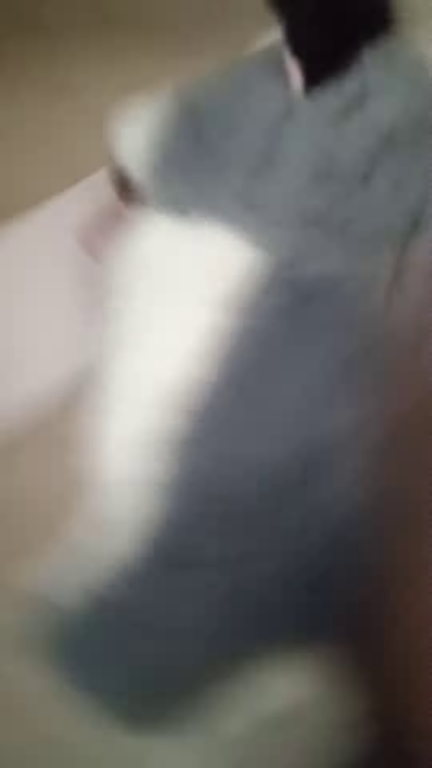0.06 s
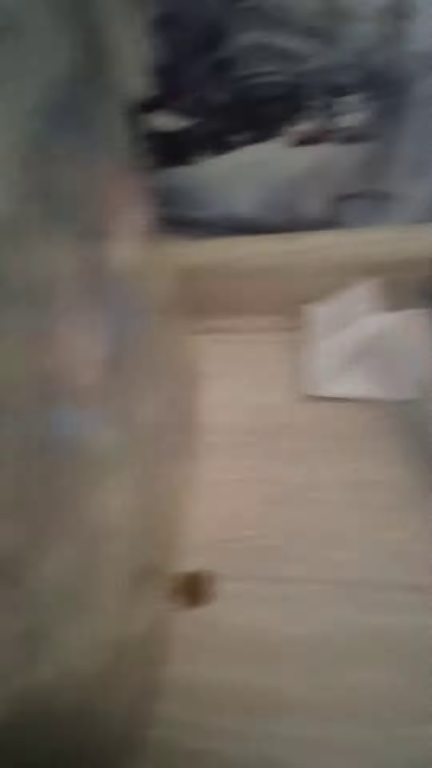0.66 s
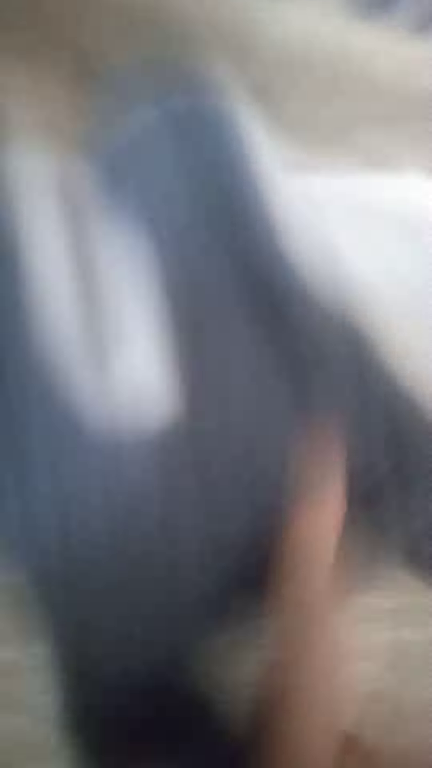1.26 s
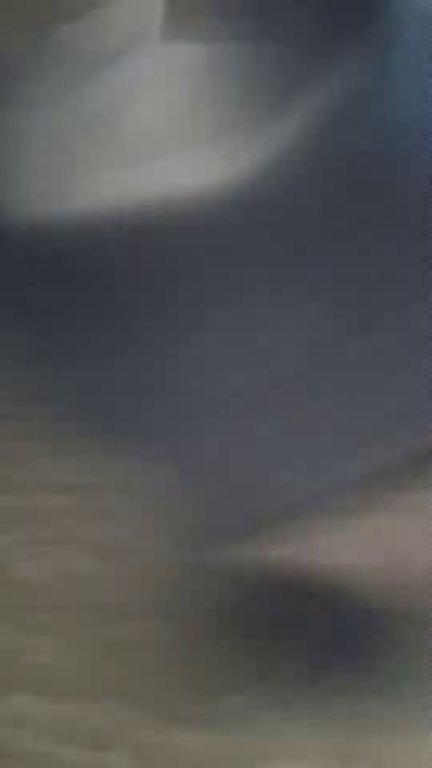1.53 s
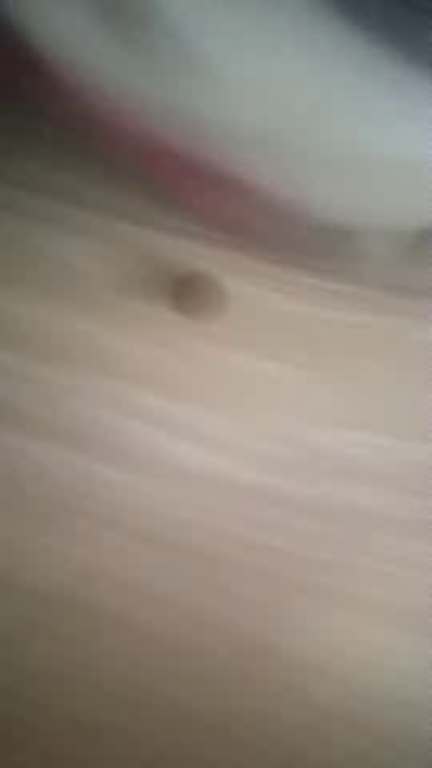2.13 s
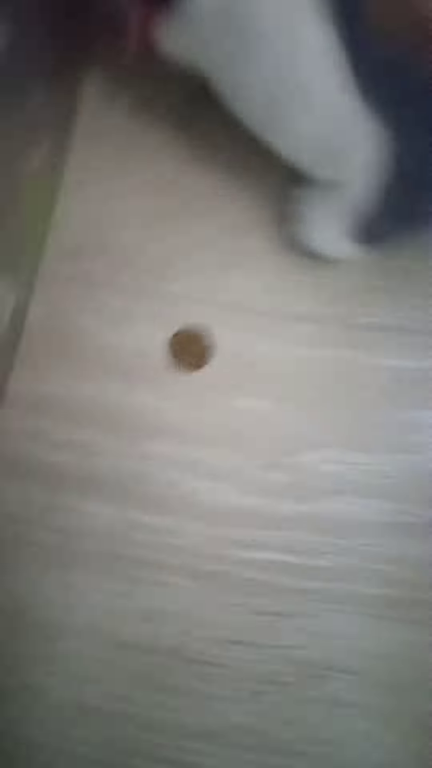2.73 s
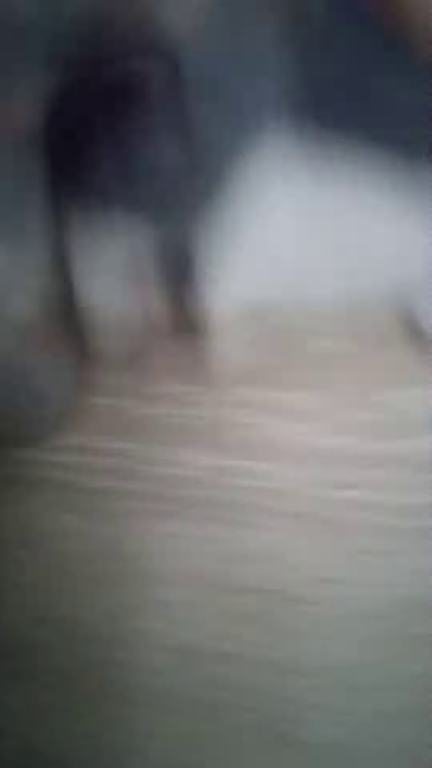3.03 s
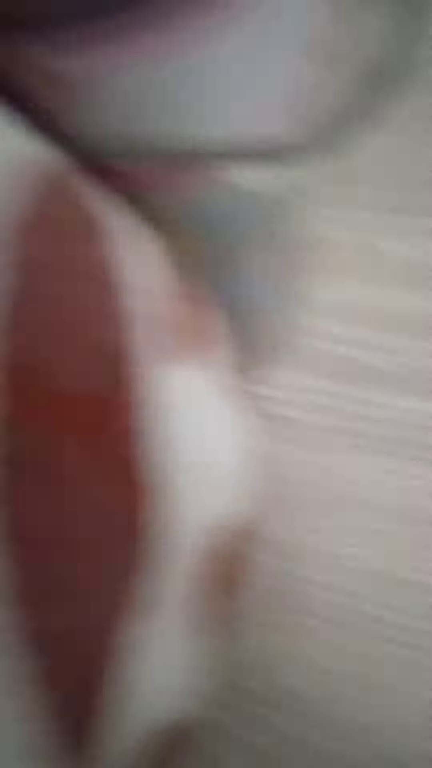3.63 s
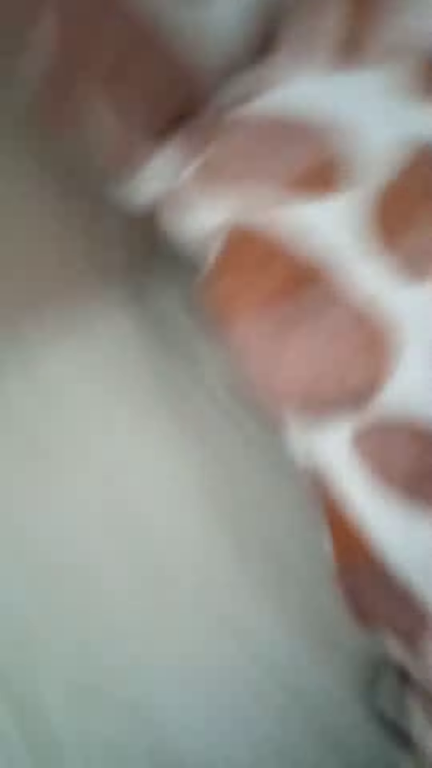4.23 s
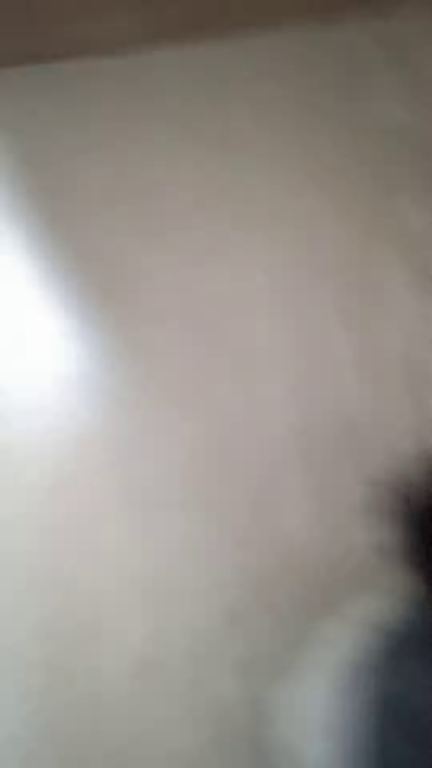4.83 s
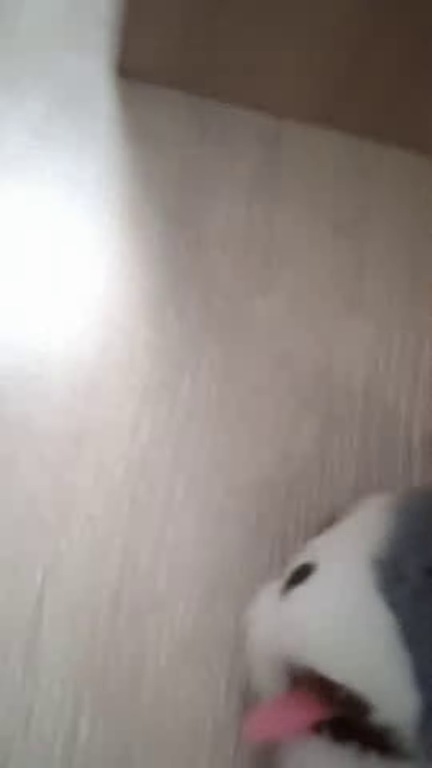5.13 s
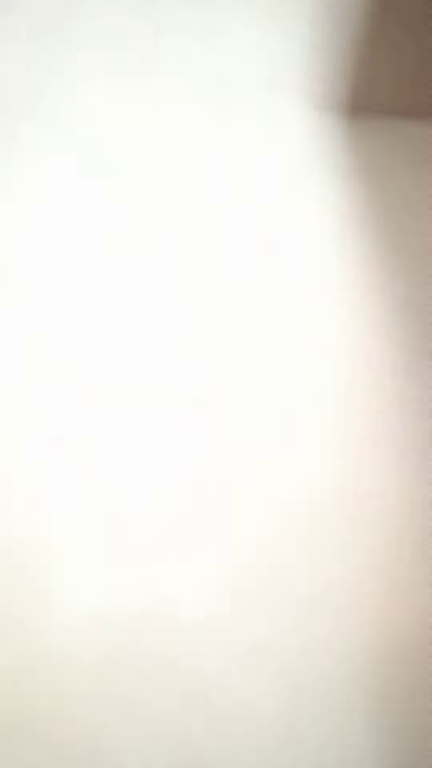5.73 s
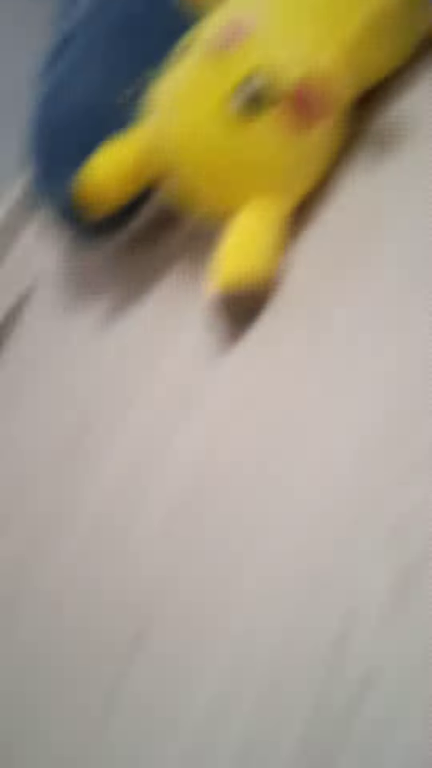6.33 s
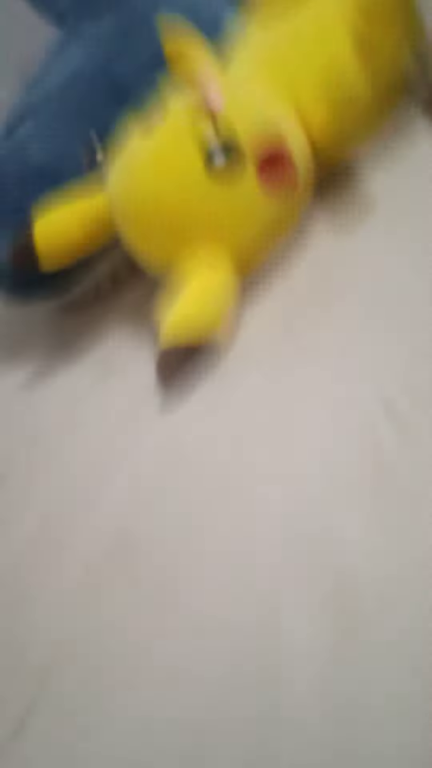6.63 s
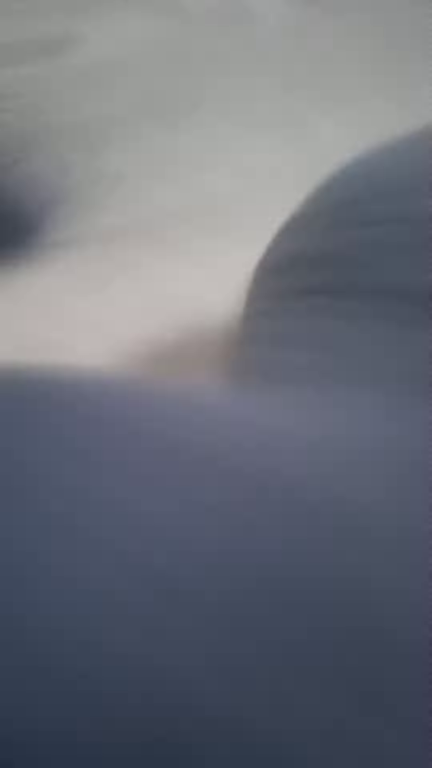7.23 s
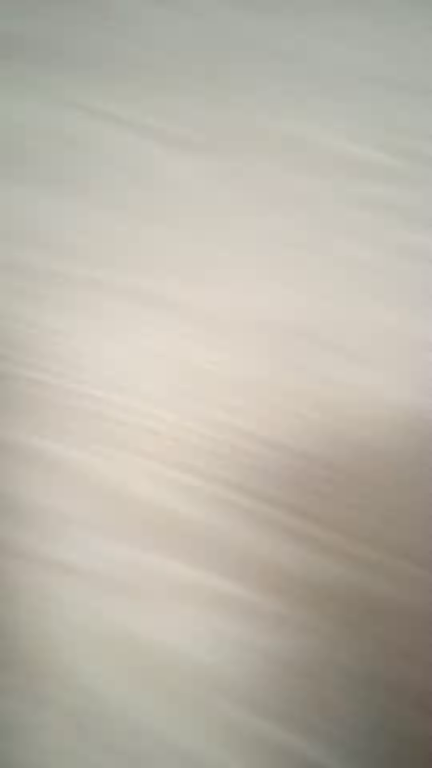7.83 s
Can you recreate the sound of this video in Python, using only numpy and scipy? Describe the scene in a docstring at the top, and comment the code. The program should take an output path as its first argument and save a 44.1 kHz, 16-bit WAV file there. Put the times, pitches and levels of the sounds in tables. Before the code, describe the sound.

A plush toy is squeezed and pushed about on a wooden floor, close to the microphone. Faint, very short reedy squeaks start at once, among swishing fabric and dull bumps, with a firm thump at about 0.8 seconds. From 1.4 to 3.1 seconds the squeaks come quickly and unevenly, some higher and raspier, the loudest near 1.7 seconds. Hands and toys thump and clack most busily between 1.6 and 2.1 seconds, and the stuffing crunches softly with each squeeze. Weaker squeaks and lighter knocks continue until about 5.1 seconds. A quieter stretch follows, with only faint rubbing and a few soft thuds. One last sharp squeak sounds at about 7.1 seconds, then a solid knock at 7.3 and light rustling and taps until the end near 8 seconds. The small room adds a short echo and a faint hush.

```python
"""Squeaky plush toy on a wooden floor

A plush toy is pushed about and squeezed in quick, short bursts. Each squeeze blows air through a
reed for a few hundredths of a second, and the pitch rises and sags with the air pressure.
Fabric rustles, stuffing crunches, and hands and toys bump the floor and the hand-held phone.
A small room adds its echo and a faint background hush."""
import sys
import numpy as np
from scipy import signal
from scipy.fft import rfft, irfft
from scipy.io import wavfile
from scipy.ndimage import uniform_filter1d, map_coordinates

SR = 44100
rng = np.random.default_rng(int(sys.argv[2]) if len(sys.argv) > 2 else 0)


def waveform_to_disk(signal):
    """Save audio, clipped to [-1, 1], as 16-bit WAV at the path in sys.argv[1]."""
    frames = np.transpose(np.atleast_2d(signal))
    scaled = np.clip(frames, -1, 1) * 32767
    samples = np.round(scaled).astype(np.int16)
    wavfile.write(sys.argv[1], SR, samples)


N = 347052
TIME = np.arange(N) / SR
TOP_HZ = 16000


def amp(db):
    """Turn decibels into a number to multiply by."""
    return 10 ** (np.asarray(db) / 20)


def unit(x):
    """Scale a sound to an average (rms) level of 1."""
    return x / np.sqrt(np.mean(x ** 2))


def gain_at(hz, points):
    """Read the gain at a pitch from a tone colour: a list of (pitch_hz, level_db) points."""
    pitch_hz, level_db = np.transpose(points)
    return amp(np.interp(np.log(np.maximum(hz, 1)), np.log(pitch_hz), level_db))


def colour(x, points):
    """Turn the lows and highs of a sound up or down to follow a tone colour."""
    return irfft(rfft(x) * gain_at(np.fft.rfftfreq(len(x), 1 / SR), points), len(x))


def band(x, low_hz, high_hz, order=2):
    """Keep the part of a sound between two pitches."""
    return signal.sosfilt(signal.butter(order, [low_hz, high_hz], "band", fs=SR, output="sos"), x)


def wander(turns_per_s):
    """A random curve that drifts around zero, by about 1 either way."""
    knots = rng.standard_normal(N // 4)
    return np.interp(TIME * turns_per_s, np.arange(len(knots)), knots)


def add(track, start_s, sound):
    """Mix a sound into a track at the given time."""
    i = int(start_s * SR)
    track[i:i + len(sound)] += sound[:N - i]


def fade(t, fade_s):
    """A curve that dies away, dropping 60 dB in fade_s seconds."""
    return np.exp(-np.log(1000) * t / fade_s)


def ring(t, hz, fade_s):
    """One dying tone of something struck."""
    return np.sin(2 * np.pi * hz * t) * fade(t, fade_s)


def burst(x, seconds):
    """Give a short sound the energy of level 1 held for the given time."""
    return x * np.sqrt(seconds * SR / np.sum(x ** 2))


# Tone colour of the quiet room: pitch_hz, level_db
HUSH_COLOUR = [(40, -10.5), (110, -0.5), (300, -10.5), (2200, -16.5), (4000, -24.5), (7000, -22.5),
               (11000, -38.5)]


def background(level_db=-69.0):
    """Faint air in the room and hiss from the microphone."""
    return amp(level_db + wander(1.1)) * unit(colour(rng.standard_normal(N), HUSH_COLOUR))


# Tone colour of hissing fibres: pitch_hz, level_db
FABRIC_COLOUR = [(1500, -6.5), (3000, -5.5), (7000, 7), (9000, -11.5), (13500, -17), (15300, -2)]
# Strokes of plush over wood and skin: start_s, end_s, swish_hz, level_db
STROKES = [(0, 0.345, 1500, -62), (0.37, 0.906, 2180, -59.5), (0.973, 1.147, 1680, -57),
           (1.291, 1.86, 1650, -61), (1.954, 2.226, 2130, -59), (2.33, 2.72, 2400, -67),
           (3.098, 3.554, 2980, -67), (3.547, 3.777, 2730, -57), (4.159, 4.606, 901, -67),
           (5.118, 5.507, 1500, -67.5), (5.8, 5.953, 1710, -73.5), (6.191, 6.777, 2310, -84),
           (6.826, 7.363, 2204, -70.5), (7.516, 7.738, 2000, -66.5), (7.721, 7.893, 1470, -64)]


def rubbing(catches_per_s=65, catch_fade_s=0.013, swish_width=1.15, seam_db=-22.5, hold_s=0.59):
    """Sliding plush swishes and hisses, rumbles in the phone and crackles at the seams."""
    out = np.zeros(N)
    hiss = unit(colour(rng.standard_normal(N), FABRIC_COLOUR))
    rumble = unit(band(rng.standard_normal(N), 75, 350))
    scrape = unit(band(rng.standard_normal(N), 300, 1700))
    catches = rng.random(N) < catches_per_s / SR
    catches = catches * amp(3.5 * np.minimum(rng.exponential(size=N), 2))
    slip = fade(TIME[:SR // 20], catch_fade_s)
    catches = signal.fftconvolve(catches, slip * (1 - slip))[:N]  # each catch gives way softly
    crackle = unit(band(catches * rng.standard_normal(N), 450, 3000))
    travel = np.cumsum(1 + 0.11 * wander(10))  # a faster hand makes a higher swish
    for start_s, end_s, swish_hz, level_db in STROKES:
        i = np.flatnonzero((TIME > start_s) & (TIME < end_s))
        swell = np.sin(np.pi * (TIME[i] - start_s) / (end_s - start_s)) ** 0.24
        noise = rng.standard_normal(2 * len(i))
        narrow = unit(band(noise, swish_hz / swish_width, swish_hz * swish_width))
        swish = map_coordinates(narrow, [travel[i] - travel[i[0]]], order=3)
        swish += amp(-4) * rumble[i] + amp(-8) * scrape[i]
        out[i] += amp(level_db) * swell * (amp(-1) * swish + amp(-1.5) * hiss[i] + amp(2) * crackle[i])
    out += amp(seam_db) * grip(hold_s) * crackle  # gripping the toy also crackles the seams
    return out * amp(4.5 * wander(22))  # the hand presses unevenly


def light_taps(per_stroke=4, scatter_db=4, fade_s=0.018):
    """Fingertips and seams tap at random moments during every stroke."""
    force = np.zeros(N)
    tap = burst(fade(TIME[:SR // 20], fade_s), 0.0044)
    for start_s, end_s, _, stroke_db in STROKES:
        for when, strength in rng.random((per_stroke, 2)):
            tap_s = start_s + when * (min(end_s, TIME[-1]) - start_s)
            add(force, tap_s, amp(stroke_db - 2 * scatter_db * (1 - strength)) * tap)
    return force * unit(band(rng.standard_normal(N), 900, 2800))


# Squeezes of the toy; low_tones_db turns the squeak's lowest tones up or down.
# peak_s, length_s, top_pitch_hz, level_db, low_tones_db, rebound_count
SQUEEZES = [(0.102, 0.012, 966, -40, -3.5, 0), (0.195, 0.015, 933, -37, 2.5, 0),
            (0.635, 0.014, 983, -33, 1, 0), (1.029, 0.042, 993, -32.5, -10, 0),
            (1.327, .013, 832.9, -42, -4, 0), (1.426, 0.017, 986.6, -30, -8, 0),
            (1.545, .032, 1477, -23, -2.5, 1), (1.672, 0.018, 1088, -17, -11, 0),
            (1.868, .022, 1112, -30.5, -4.5, 1), (1.916, .026, 1023, -25.5, -1, 1),
            (2.097, .022, 991, -34.5, 0.5, 0), (2.276, 0.017, 1179, -24.5, 0, 0),
            (2.46, 0.019, 1060, -28, -2, 0), (2.662, .014, 1015, -31.5, -3, 0),
            (2.698, .015, 929, -40, -9, 0), (2.817, 0.032, 1232, -27.5, -5, 1),
            (3.003, 0.012, 885, -42.5, -3, 0), (3.09, 0.029, 1280, -24, -6.5, 0),
            (3.469, .015, 970, -30.5, -4, 0), (3.553, 0.014, 873, -34.5, -12, 0),
            (3.679, .017, 961, -30, -23, 0), (3.962, 0.018, 1001, -29.5, -4, 0),
            (4.273, 0.013, 942, -35, -5, 0), (4.381, 0.012, 869, -37.5, 7, 0),
            (4.439, 0.036, 895, -40, -3, 0), (4.887, .034, 839, -40.5, 0, 0),
            (5.113, .027, 984, -32, -2.5, 0), (7.065, 0.018, 1002, -24.5, -16, 1)]
REED_HZ = 970  # the reed's own pitch; a harder blow forces it higher


def puffs(gap_in_lengths=0.92, rebound_db=-3.5, pitch_share=0.45):
    """List the puffs of air: one per squeeze, and a weaker one when the bellows spring back."""
    return [(peak_s + k * gap_in_lengths * length_s, length_s,
             REED_HZ + (hz - REED_HZ) * pitch_share ** k, level_db + k * rebound_db, low_db)
            for peak_s, length_s, hz, level_db, low_db, rebounds in SQUEEZES
            for k in range(round(rebounds) + 1)]


def air_pressure(rise=0.075, sag=0.13, leak=0.015, reach=1.1):
    """Each puff swells and falls. Returns the reed's pitch, the blow's strength and the low tones' dB."""
    weight, pitch, power, low = np.zeros((4, N))
    for peak_s, length_s, hz, level_db, low_db in puffs():
        i = np.flatnonzero(abs(TIME - peak_s) < reach * length_s / 2)
        place = (TIME[i] - peak_s) / (length_s / 2)  # negative before the peak, positive after
        arch = np.cos(np.pi / 2 * place / reach) ** 1.64
        # The pitch starts a little low and sags as the air runs out.
        droop = np.where(place < 0, rise * abs(place) ** 3, sag * place ** 2) + leak * place
        droop += max(1 - REED_HZ / hz, 0) * (1 - arch ** 0.7)  # a forced pitch holds only at the peak
        weight[i] += arch
        pitch[i] += arch * hz * (1 - droop)
        power[i] += arch * amp(level_db) ** 2
        low[i] += arch * low_db
    weight[weight == 0] = 1
    blended_hz = np.interp(TIME, TIME[pitch > 0], (pitch / weight)[pitch > 0])  # puffs share one reed
    smooth_hz = uniform_filter1d(blended_hz, size=130)  # the reed cannot change pitch at once
    return smooth_hz, np.sqrt(power), low / weight


def grip(hold_s):
    """How hard the hand holds the toy: the blow, spread over the time of closing and letting go."""
    _, blow, _ = air_pressure()
    size = int(hold_s * SR)
    return uniform_filter1d(uniform_filter1d(blow, size=size), size=size)


def stuffing(crunch_db=-22, hold_s=0.055):
    """The stuffing crunches as the hand closes on the squeaker and lets go."""
    fibres = unit(band(rng.standard_normal(N), 450, 4500))
    return amp(crunch_db + 4.9 * wander(200)) * grip(hold_s) * fibres


def fingers_landing(relative_db=-19, lead_s=0.006, fade_s=0.032):
    """Fingers land just before each squeak, harder for a louder squeeze."""
    out, t = np.zeros(N), TIME[:SR // 20]
    for peak_s, length_s, _, squeeze_db, _, _ in SQUEEZES:
        tap = band(rng.standard_normal(len(t)) * fade(t, fade_s), 700, 5000)
        add(out, peak_s - length_s / 2 - lead_s, amp(relative_db + squeeze_db) * burst(tap, 0.005))
    return out


# Tone colour of the reed in its tube: pitch_hz, level_db
SQUEAKER_COLOUR = [(1000, -3), (2000, -5), (3000, -9), (4300, -7), (4700, 0), (6000, -1.5), (7000, -8.5),
                   (8200, -17), (9500, -15.5), (11200, -28.5), (12600, -26), (14000, -24), (15200, -29)]


def squeaker(pitch_wobble=0.06, drift_db=5.0, flutter_db=3.5, clean_hz=1010, wild_hz=1600):
    """A reed buzzes in a short plastic tube; blown too hard, it rattles and hisses."""
    hz, blow, low_db = air_pressure()
    overblown = np.maximum(hz - clean_hz, 0) / (wild_hz - clean_hz)
    rough = np.clip(0.2 + overblown + (4 * blow) ** 2, 0, 1)  # even a gentle puff rasps a little
    phase = 2 * np.pi * np.cumsum(hz * (1 + pitch_wobble * rough * wander(900))) / SR
    tone, power = np.zeros((2, N))
    for k in range(1, 19):  # tones at whole multiples of the pitch
        strength = gain_at(k * hz, SQUEAKER_COLOUR) * (k * hz < SR / 2)
        strength *= amp(drift_db * wander(60))  # stuffing and fingers muffle each tone differently
        lowness = np.clip(2 - k * hz / 2200, 0, 1)
        strength *= amp(low_db * lowness)
        tone += strength * np.sin(k * phase + rng.uniform(0, np.pi))
        power += strength ** 2 * (1 - lowness / 2) / 2
    pulsing_air = rng.standard_normal(N) * (1 + np.cos(phase))
    hiss = unit(band(colour(pulsing_air, SQUEAKER_COLOUR), 2200, TOP_HZ, order=1))
    reed = tone / np.sqrt(power) * amp(flutter_db * rough * wander(700))
    return blow * (reed + rough * hiss)


# Low tones of the wooden floor: pitch_hz, fade_s, level_db
FLOOR_TONES = [(86.5, 0.27, -17.5), (114.1, 0.16, -13), (171.9, 0.13, -12.5), (328, 0.1, -14.5)]
# Tone colour of the tick of contact: pitch_hz, level_db
TICK_COLOUR = [(1800, -9.5), (3000, -11.5), (6800, -1), (8500, -13.5), (13000, -25), (15500, -17.5)]
# Bumps of hands and toys: start_s, thump_hz, thump_db, clack_db, hardness (0 padded, 1 bare)
BUMPS = [(0.243, 84, -55, -45, 0.5), (0.3139, 340, -47, -48, 0.54), (0.4157, 228, -34.5, -34.5, 0.63),
         (0.4301, 83, -36, -37.5, 0.54), (0.6947, 340, -28, -37.5, 0), (0.8036, 303.3, -20.5, -29.5, 0.64),
         (1.0123, 358, -39, -38.5, 0.65), (1.2048, 105.3, -28, -35.5, 0.26), (1.299, 124.7, -47, -43, 0.43),
         (1.3534, 101, -35, -36.5, 0.58), (1.4101, 270, -32.5, -36.5, 0), (1.5893, 307, -20.5, -26.5, 0.72),
         (1.6586, 294, -25, -27.5, 0.11), (1.833, 205, -23.5, -32.5, 0.65),
         (1.8397, 170.3, -32, -33.5, 0.92), (1.872, 180.1, -33, -30.5, 0.4),
         (1.9426, 373, -26.5, -31, 0.76), (2.0092, 311, -53, -38, 0.75), (2.049, 353, -26, -26.5, 0.45),
         (2.0759, 373, -22, -24, 0.59), (2.088, 380, -43, -35, 0.6), (2.3425, 418, -35.5, -35.5, 0.67),
         (2.351, 365, -36, -31, 0.16), (2.535, 323, -31.5, -40.5, 0), (2.6778, 350, -44, -44.5, 0.1),
         (3.0941, 401, -31.5, -24.5, 0.64), (3.4462, 380, -42.5, -36.5, 0.83),
         (3.668, 156.3, -34.5, -34, 0.74), (3.7359, 367, -46.5, -46, 1), (3.9741, 281.2, -39.5, -35, .7),
         (4.1222, 413.5, -49, -59.5, 1), (4.1568, 330, -46.5, -53, 0), (4.367, 247, -39, -37, 0.08),
         (4.5212, 375, -59, -35.5, 0.55), (4.6455, 450, -75.5, -33, 0.15), (4.8523, 131, -49, -47.5, 0.53),
         (4.9485, 166.6, -41.5, -40, 0.12), (5.0688, 369, -47, -41, 0.58), (5.271, 258, -58.5, -42, 0.3),
         (5.432, 105, -50.5, -75, 0.42), (6.2459, 142.4, -44.5, -56.5, .7), (6.3486, 85, -40.5, -61, 0.46),
         (6.8743, 148, -46.5, -52, 0.91), (7.0924, 151, -29.5, -62, .5), (7.1515, 473.5, -37.5, -34, 0.43),
         (7.1615, 443, -51, -36.5, 0.98), (7.3397, 237.5, -26, -23.5, 0.61), (7.572, 305, -70, -47.5, 0),
         (7.7427, 192, -55, -48, 0.7), (7.7813, 337, -59, -44.5, 0.62)]


def bumps(thump_fade_s=0.04, clack_fade_s=0.024, tick_fade_s=0.023, clack_width=1.9):
    """Each bump is a dull thump that shakes the floor, a hollow clack and a bright tick."""
    out, t = np.zeros(N), TIME[:SR // 3]
    for start_s, thump_hz, thump_db, clack_db, hardness in BUMPS:
        # A harder contact has a higher clack and a louder tick.
        clack_hz = np.interp(hardness, [0, 1], [1040, 1500])
        tick_db = clack_db + np.interp(hardness, [0, 1], [-20, 4.5])
        soft_start = 1 - fade(t, 0.0036)  # padding spreads out the contact
        clack_noise, tick_noise = rng.standard_normal((2, len(t))) * soft_start
        boards = sum(amp(level_db + 2 * rng.standard_normal()) * ring(t, hz, fade_s)
                     for hz, fade_s, level_db in FLOOR_TONES)
        thump = amp(6) * ring(t, thump_hz, thump_fade_s) * (1 - fade(t, 0.00072))
        thump += amp(4) * boards * (1 - fade(t, 0.026))
        hollow = band(clack_noise * fade(t, clack_fade_s), clack_hz / clack_width, clack_hz * clack_width)
        clack = burst(hollow, 0.0056)
        tick = burst(colour(tick_noise * fade(t, tick_fade_s), TICK_COLOUR), 0.005) * (t < t[-1] / 2)
        add(out, start_s, amp(clack_db) * clack + amp(tick_db) * tick - amp(thump_db) * thump)
    return out


# The room's echo, from low to high: pitch_hz, fade_s, level_db
ECHO_BANDS = [(123.7, 0.55, -9), (500, 0.22, -5.5), (1580, 0.26, -11.5), (6000, 0.28, -14.5)]


def room_echo(x, delay_s=0.0051):
    """A small furnished room blurs sound into a short echo; the low notes last longest."""
    t = TIME[:SR // 2]
    log_hz = np.log(np.fft.rfftfreq(len(t), 1 / SR) + 1)
    centres = np.log([hz for hz, _, _ in ECHO_BANDS])
    spectrum = rfft(rng.standard_normal(len(t)))
    echo = np.zeros(len(t))
    for (_, fade_s, level_db), this_band in zip(ECHO_BANDS, np.eye(len(ECHO_BANDS))):
        noise = irfft(spectrum * np.interp(log_hz, centres, this_band), len(t))
        tail = fade(t, fade_s) * (t > delay_s)
        echo += amp(level_db) * noise * tail / np.linalg.norm(tail)
    return signal.fftconvolve(x, echo)[:N]


def scene():
    """Rubbing, squeaks and bumps, heard close by in the room."""
    direct = squeaker() + stuffing() + fingers_landing() + bumps() + rubbing() + light_taps()
    return (direct + room_echo(direct) + background())[None]


def record(dry):
    """The phone drops the deep bass and the very highest treble."""
    bass_cut = signal.butter(4, 62, "high", fs=SR, output="sos")
    treble_cut = signal.ellip(10, 0.2, 70, TOP_HZ, fs=SR, output="sos")
    return signal.sosfilt(treble_cut, signal.sosfilt(bass_cut, dry))


dry = scene()
out = record(dry)
waveform_to_disk(out)
```